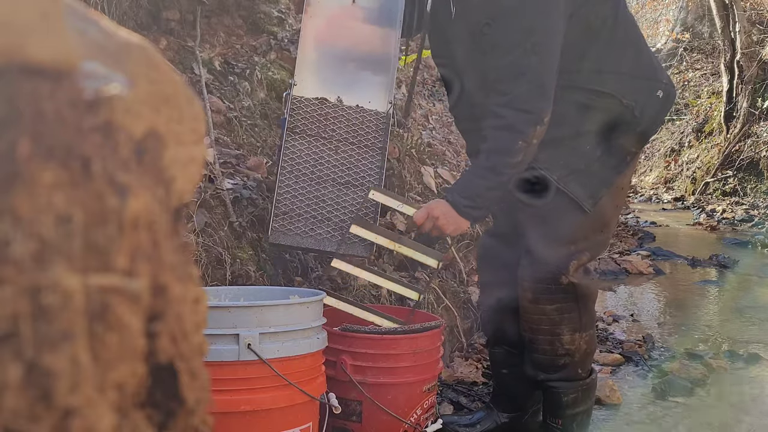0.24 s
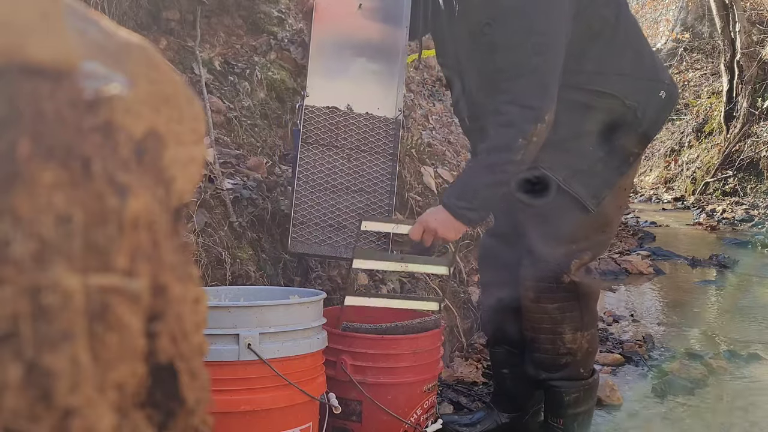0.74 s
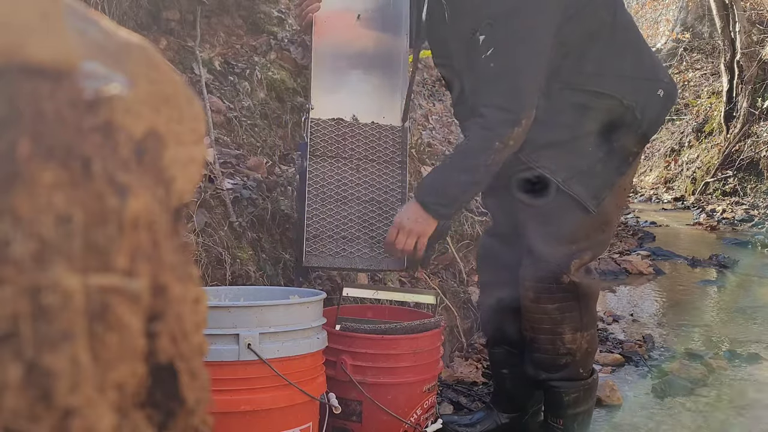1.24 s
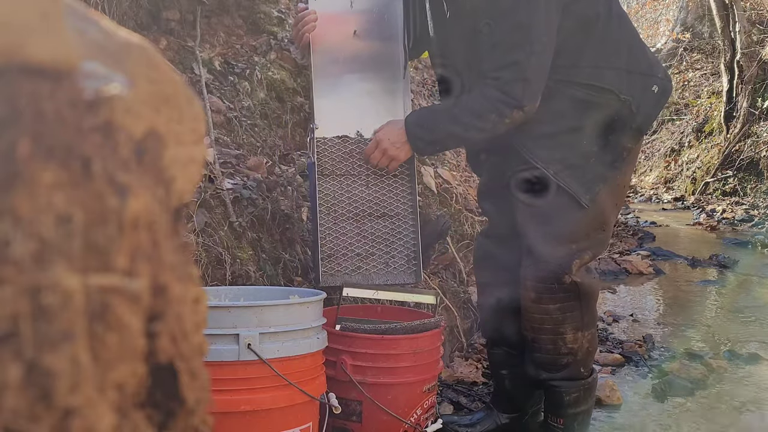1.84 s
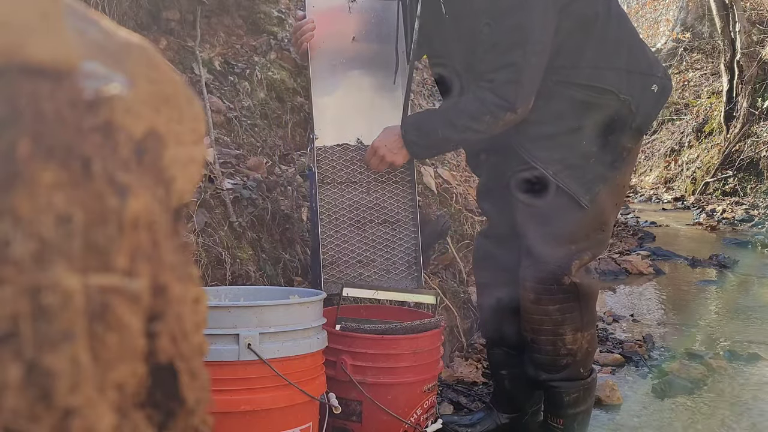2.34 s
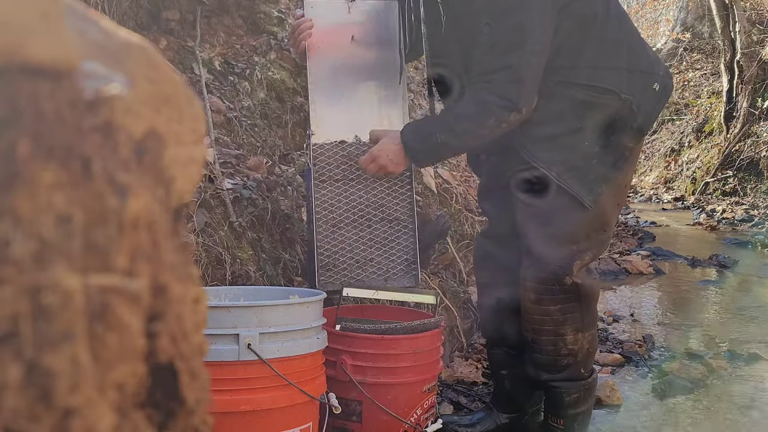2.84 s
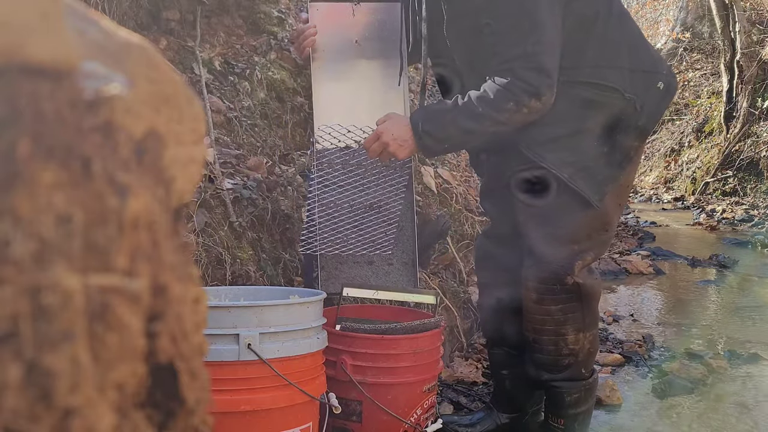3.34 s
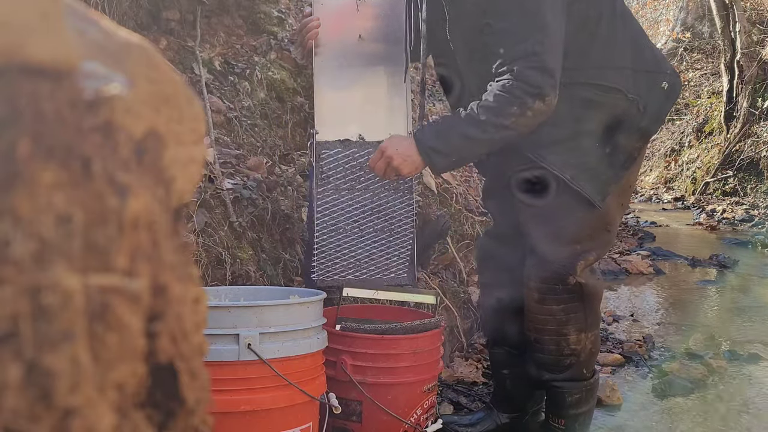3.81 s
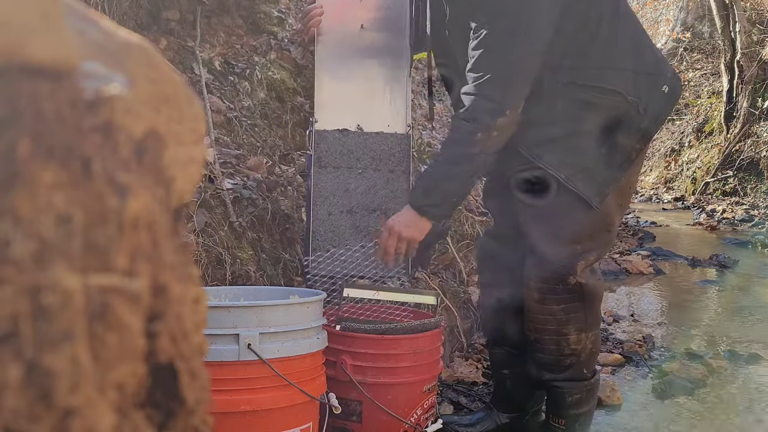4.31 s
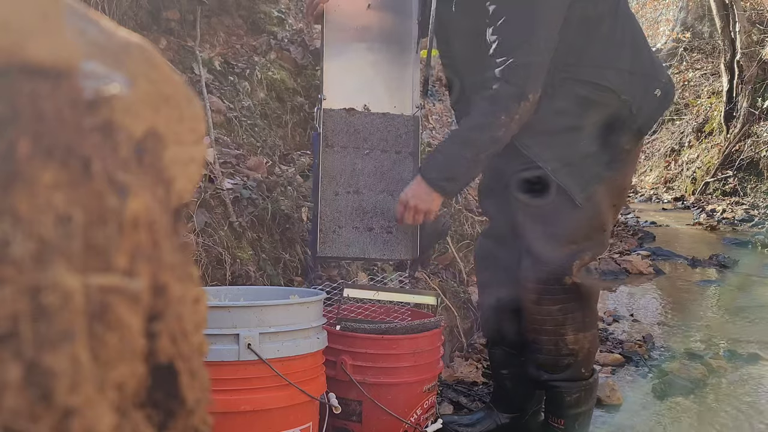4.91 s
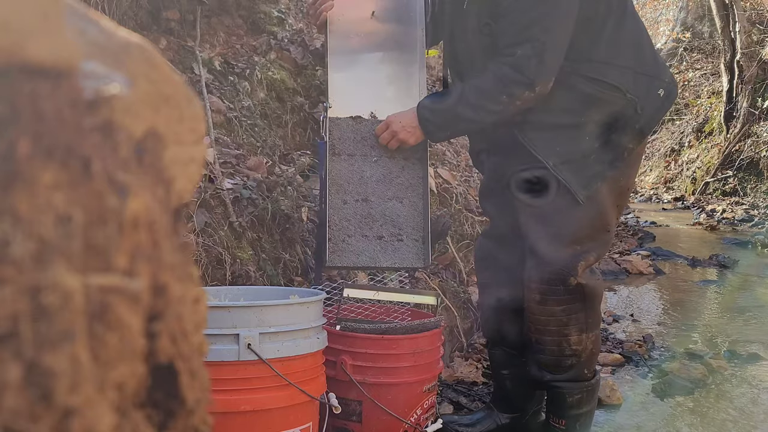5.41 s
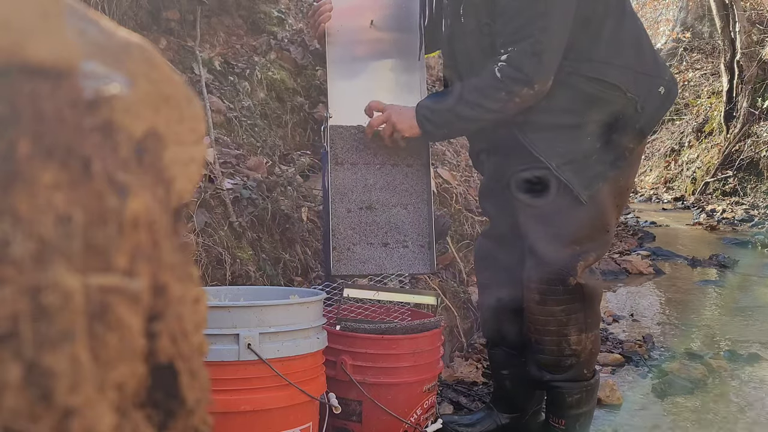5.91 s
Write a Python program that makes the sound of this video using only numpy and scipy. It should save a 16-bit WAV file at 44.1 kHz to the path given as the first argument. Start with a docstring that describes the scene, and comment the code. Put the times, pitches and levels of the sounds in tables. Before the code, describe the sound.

A creek babbles steadily while metal parts knock hollowly on a plastic bucket, a wet steel mesh scrapes harshly, then lighter clanks and bumps follow.

```python
"""Sluice box beside a creek.

An aluminium sluice box is taken apart over a plastic bucket: the riffle frame knocks (bucket modes)
and groans (a sinking tone), metal clanks (chatter through tray resonances), and a steel mesh scrapes
on the wet tray (clicks through narrow resonances). A creek runs all along, brighter on the right:
ringing bubbles and noise in third-octaves, with separate gulps, chirps, splashes and flung drops."""
import sys
import numpy as np
from scipy import signal
from scipy.fft import rfft, irfft
from scipy.io import wavfile
from scipy.ndimage import uniform_filter1d, map_coordinates

SR = 44100
rng = np.random.default_rng(int(sys.argv[2]) if len(sys.argv) > 2 else 0)


def digitize_waveform(pressure):
    """Quantize a signal to 16-bit integers and store it at the path in sys.argv[1].

    Rows of a 2-D input are taken as channels; values are limited to [-1, 1].
    """
    field = np.atleast_2d(pressure).T
    bounded = np.clip(field, -1, 1)
    quanta = np.round(bounded * 32767).astype(np.int16)
    wavfile.write(sys.argv[1], SR, quanta)


N = 271656
T = np.arange(N) / SR
HZ = np.maximum(np.arange(N // 2 + 1) * SR / N, 1)


def from_db(db):
    """Decibels to gain."""
    return 10 ** (np.asarray(db) / 20)


def rms_one(x):
    """Scale to an rms of 1."""
    return x / np.sqrt(np.mean(x ** 2) + 1e-20)


def at_hz(points):
    """Read a table of (Hz, value) along a log frequency axis."""
    hz, values = np.transpose(points)
    return np.interp(np.log(HZ), np.log(hz), values)


def drift(rate_hz):
    """Smooth random signal of rms 1: noise at SR / 40 through two equal low-pass poles."""
    r = np.exp(-80 * np.pi * rate_hz / SR)
    noise = rng.standard_normal(N // 40 + 2002)
    slow = signal.lfilter([1], [1, -2 * r, r * r], noise)[2000:]
    return np.interp(np.arange(N) / 40, np.arange(len(slow)), rms_one(slow))


def t60_decay(t, t60_s):
    """Exponential decay by 60 dB in t60_s."""
    return np.exp(-np.log(1000) * t / t60_s)


def ring(clicks, hz, t60_s):
    """Decaying mode: a unit click starts a sine of height 1."""
    r = np.exp(-np.log(1000) / (t60_s * SR))
    w = 2 * np.pi * hz / SR
    return signal.lfilter([0, np.sin(w)], [1, -2 * r * np.cos(w), r * r], clicks + 1e-18)


def resonate(x, hz, width_hz):
    """One resonance with a gain of 1 at its top."""
    r = np.exp(-np.pi * width_hz / SR)
    zeros = np.array([1, 0, -1]) * (1 - r * r) / 2
    poles = [1, -2 * r * np.cos(2 * np.pi * hz / SR), r * r]
    return signal.lfilter(zeros, poles, x + 1e-18)


def body(x, modes):
    """Resonances in parallel, signs alternating."""
    return sum((-1) ** k * from_db(db) * resonate(x, hz, width_hz)
               for k, (hz, width_hz, db) in enumerate(modes))


def cut(x, hz, kind, order=2):
    """Butterworth low- or high-pass."""
    return signal.sosfilt(signal.butter(order, min(hz, .45 * SR), kind, fs=SR, output="sos"), x)


def grains(per_s, spread_db, size=N):
    """Random clicks of uneven strength and random sign."""
    strength = from_db(spread_db * np.minimum(rng.exponential(1, size), 4))
    return (rng.random(size) < per_s / SR) * strength * rng.choice([-1, 1], size)


def scatter(count):
    """Rows of (s, strength, size): loosely spaced moments, strength -1 to 1, size 0 to 1."""
    when, strength, size = rng.random((count, 3)).T
    return zip((np.arange(count) + when) / count * N / SR, 2 * strength - 1, size)


def add(out, s, sound):
    """Mix a sound in at time s."""
    start = max(round(s * SR), 0)
    out[..., start:start + sound.shape[-1]] += sound[..., :N - start]


def note(hz, t60_s, attack_s):
    """One mode builds up during the contact and rings out."""
    t = T[:SR // 4]
    return (1 - np.exp(-t / attack_s)) * t60_decay(t, t60_s) * np.sin(2 * np.pi * hz * t)


# Contacts with the bucket, rebounds included. Each row: time in seconds, level in dB,
# pitch favoured by the place of contact in Hz, reach around it in octaves.
BUCKET_CONTACTS = [(0.5113, -9, 603, .15), (0.5258, -12.5, 195, .35), (0.5366, -10.5, 270, .25),
                   (0.5522, -16, 290, .3), (0.6837, -6, 402, 0.21), (0.6879, -11.5, 240, .25),
                   (0.701, -12.5, 414, .09), (0.713, -11.5, 410, .09), (0.7273, -13, 420, .1),
                   (1.088, -18.5, 357, .2), (1.0965, -23, 360, .15), (1.104, -24, 760, .2),
                   (1.116, -18, 230, .3), (2.818, -23, 330, 0.47), (2.853, -21, 282, 0.28),
                   (4.207, -17.5, 386, 0.16), (4.230, -19, 205, .2), (4.3583, -10.5, 500, 0.36),
                   (4.369, -15, 330, .25), (4.386, -19.5, 220, .25), (4.402, -23, 370, .25),
                   (4.450, -22.5, 840, 0.33), (4.645, -20, 493, .5), (4.665, -21, 380, .25),
                   (4.679, -25, 400, .4)]
# Modes of the bucket and the sluice resting on it. Each row: pitch in Hz, level in dB, t60 in seconds.
BUCKET_MODES = [(170, -2, 0.068), (208, -4.5, 0.038), (265, -0.5, 0.049), (363, -1.5, 0.076),
                (412, -4, 0.1), (435, -27, 0.084), (550, -7.5, 0.051), (623, -5.5, 0.06), (720, -8, 0.042),
                (814, 2.5, 0.043)]


def thumps():
    """Each contact rings the bucket's modes, most of all those near the pitch that it favours."""
    out = np.zeros(N)
    s, db, favoured_hz, reach_octaves = np.transpose(BUCKET_CONTACTS)
    for hz, mode_db, t60_s in BUCKET_MODES:
        distance = np.log2(hz / favoured_hz) / reach_octaves
        blows = np.zeros(N)
        blows[np.round(s * SR).astype(int)] = from_db(db + mode_db) / (1 + distance ** 2)
        out += ring(blows, hz, t60_s)
    return cut(out, 970, "low")  # plastic gives a soft contact


# Groan of the riffle frame on the bucket's rim as it slows.
# Each row: time in seconds, pitch in Hz, level in dB rms.
GROAN_PATH = [(0.775, 328, -45), (0.812, 320, -29.5), (0.84, 317, -32), (0.882, 292, -28.5),
              (0.905, 284, -46)]


def groan(rough_db):
    """Stick and slip on the plastic rim: a low, uneven tone that sinks in pitch."""
    s, hz, db = np.transpose(GROAN_PATH)
    level = from_db(np.interp(T, s, db) + rough_db * drift(60)) * (T > s[0]) * (T < s[-1])
    phase = 2 * np.pi * np.cumsum(np.interp(T, s, hz)) / SR
    return np.sqrt(2) * level * np.sin(phase)


# Metal on metal. Each row: time in seconds, level in dB before trim, t60 in seconds, lowest Hz,
# highest Hz, pitch of the note the spot rings with in Hz, note level in dB relative to the blow's.
METAL_BLOWS = [(0.008, -12.5, 0.027, 980, 2290, 1200, 0.5), (0.082, -26.5, 0.05, 1400, 2980, 1760, 9),
               (0.433, -22.5, 0.036, 885, 3500, 1380, 1), (0.5105, -11, .018, 1400, 2000, 1580, 5),
               (0.5114, -14, .022, 2700, 4850, 4440, -1), (0.5165, -21.5, .11, 650, 2400, 1850, -7),
               (0.683, -10, 0.035, 900, 7100, 1276, 0), (0.686, -13.5, .04, 700, 2500, 1240, 1),
               (0.6927, -18.5, 0.06, 650, 4300, 3900, -4), (0.705, -25, .05, 650, 2200, 1950, -4),
               (0.722, -23, .06, 650, 2200, 1380, -4), (1.086, -20.5, 0.06, 700, 3000, 1260, -1),
               (1.097, -22.5, 0.087, 1100, 2400, 1395, -8), (2.619, -23.5, 0.099, 1300, 2600, 1800, -6),
               (3.103, -27, 0.06, 1500, 2900, 1800, 2), (3.926, -35, 0.022, 3500, 12000, 3970, 0),
               (4.173, -26.5, 0.05, 1410, 2210, 1770, 6), (4.309, -26, 0.13, 1100, 2400, 1262, -1.5),
               (4.358, -15, 0.05, 700, 1400, 1700, 3), (4.450, -26.5, 0.08, 780, 2500, 1250, -6),
               (4.5856, -16.8, 0.016, 2210, 4270, 2220, 4.5), (4.616, -23, 0.035, 3000, 8000, 4050, 1),
               (4.645, -19, 0.044, 700, 1810, 1205, -4), (5.049, -25.5, 0.17, 1300, 2500, 1850, -8),
               (5.225, -23.5, 0.11, 1410, 4150, 1850, -12), (6.092, -33, .1, 1500, 2400, 1820, 5)]
# Broad resonances of the tray. Each row: centre in Hz, width in Hz, gain in dB.
TRAY_MODES = [(620, 64, -2.5), (803, 78, 5), (1190, 177, 5), (1470, 23, 4), (1653, 116, -0.5),
              (1920, 390, -1), (2332, 35, 2), (3560, 540, -8), (4040, 160, 3.5), (5700, 540, -4),
              (7130, 250, 1.5), (12500, 14500, 0.5)]
CONTACTS_PER_S, CONTACT_SPREAD_DB, NOTE_ATTACK_S = 4000, 3, 0.0014
CRACK_DB, CRACK_S = -4, .0018  # sharp first contact
CHATTER_TRIM_DB = -4.5


def clanks(width):
    """A sharp contact and a loose, fast-dying chatter ring the tray, with one note standing out."""
    out, t = np.zeros((2, N)), T[:SR // 4]
    for s, db, t60_s, low_hz, high_hz, note_hz, note_db in METAL_BLOWS:
        fade = t60_decay(t, t60_s) + from_db(CRACK_DB) * np.exp(-t / CRACK_S)
        clicks = np.array([grains(CONTACTS_PER_S, CONTACT_SPREAD_DB, size=len(t)) for _ in range(2)])
        chatter = body(clicks * fade, TRAY_MODES)
        chatter = cut(cut(chatter, high_hz, "low", order=12), low_hz, "high", order=4)
        mid, side = (rms_one(v) for v in chatter)
        stereo = mid + width * side * np.array([[1], [-1]])
        add(out, s, from_db(db + CHATTER_TRIM_DB) * np.sqrt(np.mean(fade ** 2)) * stereo)
        add(out, s, from_db(db + note_db) * note(note_hz, t60_s, NOTE_ATTACK_S) * from_db([[-1], [1]]))
    return out


PULL_RELEASE_S = 0.03


def pull(start_s, attack_s, length_s):
    """A pull swells as it takes hold, keeps its speed and dies away."""
    attack = np.clip((T - start_s) / attack_s, 0, 1)
    return attack * np.exp(-np.clip((T - start_s - length_s) / PULL_RELEASE_S, 0, 20))


def wires(x, width_hz, count):
    """The many lesser strands ring closely spaced, narrow modes all through the treble."""
    pitches_hz = np.linspace(5000, 15600, count) + rng.normal(0, 60, count)
    return sum((-1) ** k * resonate(x, hz, width_hz) for k, hz in enumerate(pitches_hz))


# Pulls of the mesh along the tray, the last as it is laid back. Each row: start in seconds,
# time to take hold in seconds, length in seconds, screech drive in dB, rasp drive in dB.
MESH_PULLS = [(0.585, 0.039, 0.13, -29, -23), (0.743, .004, 0.013, -21.5, -24),
              (0.76, 0.029, 0.11, -23, -22), (0.904, 0.047, 0.089, -20.5, -23),
              (0.98, 0.0087, .045, -23.5, -22), (1.022, 0.031, 0.058, -17, -18),
              (4.27, .04, 0.081, -29, -26.5), (4.422, 0.031, 0.18, -43, -32)]
# Mesh strands that sing as the edge passes them.
# Each row: pitch in Hz, width in Hz, relative level in dB, time when loudest in seconds.
MESH_STRANDS = [(3790, 37, -1, 1.07), (4530, 70, -6, .83), (5110, 38, -3, 0.96), (5570, 35, 2, 1.05),
                (5830, 80, 1, 1.03), (6330, 56, -5, .78), (6500, 60, 0, .98), (6850, 29, 2, 0.69),
                (7060, 75, 4, 1.01), (7160, 33, 5, 0.8), (7480, 40, 3, 0.83), (7900, 30, 0, 0.93),
                (8350, 39, 0, 0.79), (9400, 50, -6, 0.99), (11000, 58, 2, 0.79), (11260, 50, 2.5, 1.076),
                (11400, 55, 0, 1), (12700, 60, -2, 0.93), (14030, 70, 0, 0.82), (14600, 60, -3, 1.04)]
STUTTER_DB, STRAND_WAVER_S = 1.4, .00004


def drag(passing_s):
    """Wet grit catches under the mesh: its strands sing in turn, the tray rasps, the bucket drones."""
    stutter = from_db(STUTTER_DB * drift(46))
    drives = [from_db([[screech_db], [rasp_db]]) * pull(start_s, attack_s, length_s)
              for start_s, attack_s, length_s, screech_db, rasp_db in MESH_PULLS]
    screech, rasp = stutter * np.max(drives, axis=0)
    catches, scattered = rms_one(grains(3000, 2.6)), rms_one(grains(6000, 3.4))
    screech_catches, rasp_catches = catches * screech, catches * rasp

    strands = 0
    for hz, width_hz, db, loudest_s in MESH_STRANDS:
        passing = 1 + ((T - loudest_s) / passing_s) ** 2
        strands = strands + from_db(db) * resonate(screech_catches / passing, hz, width_hz)
    # the flexing mesh bends their pitch
    strands = map_coordinates(strands, [(T + STRAND_WAVER_S * drift(16.6)) * SR], order=3)

    ahead = 3.24 * strands + cut(screech_catches, 5200, "high")
    ahead = ahead + 1.1 * wires(screech_catches, width_hz=32, count=56)
    ahead = ahead + 0.78 * body(rasp_catches, TRAY_MODES)
    ahead = ahead + 2.0 * resonate(rasp_catches, 305, 130)  # bucket drone
    around = 0.31 * cut(body(scattered * rasp, TRAY_MODES), 6000, "low")
    around = around + 0.68 * resonate(scattered * screech, 4500, 2500)
    return ahead + around * np.array([[1], [-1]])  # the wide tray radiates differently to each side


# Short scrapes of metal and grit, with a few drips and splashes.
# Each row: start in seconds, level in dB, length in seconds, centre in Hz.
SCRAPES_AND_DRIPS = [(.004, -24, 0.0087, 6960), (.076, -24.5, 0.0073, 13000), (.426, -29, 0.015, 11000),
                     (.496, -29, 0.014, 1870), (.497, -30, 0.022, 4300), (.597, -30, 0.0034, 6500),
                     (.627, -28, .012, 1800), (.656, -29, 0.022, 3630), (.682, -18.5, 0.0084, 8850),
                     (.682, -23, 0.0061, 2100), (.760, -23, 0.019, 14000), (.945, -26, .02, 6800),
                     (3.101, -29, .012, 6140), (5.655, -33, .012, 6900), (1.054, -20, .018, 5970),
                     (1.449, -27.5, 0.017, 6500), (1.973, -32, 0.036, 2030), (2.703, -31, 0.025, 8060),
                     (3.267, -22.5, 0.013, 14100), (4.110, -31, 0.013, 6430), (4.206, -28, 0.025, 6560),
                     (4.286, -28, 0.031, 13200), (4.298, -29, 0.021, 6000), (4.515, -32, .02, 6000),
                     (5.045, -33, 0.013, 4060)]
SPLAT_DB, SPLAT_SPREAD_DB, SPLAT_S, SPLAT_HZ = -38, 1, 0.02, 6950  # faint creek splashes at random


def scuffs_and_splats():
    """Brief scrapes and splashes swell quickly and die, each ringing one broad resonance."""
    out = np.zeros(N)
    splats = [(s, SPLAT_DB + SPLAT_SPREAD_DB * strength, SPLAT_S, SPLAT_HZ * 2 ** (0.86 * (size - .5)))
              for s, strength, size in scatter(count=12)]
    for s, db, length_s, hz in list(SCRAPES_AND_DRIPS) + splats:
        t = T[:int(3 * length_s * SR)] / (length_s / 3)
        swell = t * np.exp(1 - t)
        burst = resonate(grains(8000, 0.46, size=len(t)) * swell, hz, 0.2 * hz)
        add(out, s, from_db(db) * np.sqrt(np.mean(swell ** 2)) * rms_one(burst))
    return out


# Modes rung as the mesh sticks and slips on the flexing tray.
# Each row: pitch in Hz, gain per slip in dB, t60 in seconds.
JUDDER_MODES = [(300, -18, 0.0081), (536, -11.5, 0.01)]


def judder(start_s, slips_per_s):
    """Six quick, soft slips make one hollow bonk."""
    slips = np.zeros(N)
    for k, db in enumerate([5.5, 7.5, 4.5, -1, 3.0, -15]):
        slips[round((start_s + k / slips_per_s) * SR)] = from_db(db)
    bonk = sum(from_db(db) * ring(slips, hz, t60_s) for hz, db, t60_s in JUDDER_MODES)
    return cut(bonk, 540, "low", order=4)


# Light, hollow tock as the mesh is picked up. Each row: pitch in Hz, level in dB, t60 in seconds.
TOCK_MODES = [(737, -20.5, 0.065), (860, -20, 0.032)]


def tock(s, attack_s):
    """A soft touch rings two close, hollow modes."""
    out = np.zeros(N)
    add(out, s, sum(from_db(db) * note(hz, t60_s, attack_s) for hz, db, t60_s in TOCK_MODES))
    return out


def banks(x):
    """A few softened echoes from the ground and the creek banks, different on each side."""
    out, dull = np.zeros((2, N)), cut(cut(x, 9100, "low"), 380, "high")
    lags_s = np.geomspace(.006, .075, num=12) * rng.uniform(.9, 1.1, 12)
    for k, lag_s in enumerate(lags_s):
        add(out[k % 2], lag_s, dull[k % 2] * from_db(-150 * lag_s) * (-1) ** (k // 2))
    return out


def babble(low_flicker_db, high_flicker_db, surge_db, bubble_share, cycles):
    """White water noise: in each third of an octave, bubbles ring over a rush of finer spray."""
    out, surge = 0, 0.35 * drift(18.0) + 0.34 * drift(37)
    for hz in 25 * 2 ** (np.arange(29) / 3):
        treble = np.clip(np.log(hz / 300) / np.log(8000 / 300), 0, 1)
        bubbles = rms_one(ring(grains(70 + hz / 14, 2.8), hz, cycles / hz))
        rush = rms_one(resonate(rng.standard_normal(N), hz, hz / 3))
        share = np.clip(bubble_share, 0, 1) * (hz > 150)
        water = np.sqrt(share) * bubbles + np.sqrt(1 - share) * rush
        flicker_db = low_flicker_db * (1 - treble) + high_flicker_db * treble
        level = from_db(flicker_db * drift(17.4) + surge_db * treble * surge)
        out = out + np.sqrt(hz) * rms_one(water * level)
    spectrum = rfft(out)
    # even out the long-term colour to unit power per Hz
    power = uniform_filter1d(abs(spectrum) ** 2 + 1e-6, size=301)
    return spectrum * np.sqrt(N * SR / 2 / power)


def glances(echoes):
    """Short reflections ripple the colour like a comb."""
    return 1 + sum(gain * np.exp(-2j * np.pi * HZ * delay_s) for delay_s, gain in echoes)


# Creek colour at each microphone, before glances and swell. Each row: Hz, density in dB per Hz.
LEFT_COLOUR = [(25, -88), (60, -71.5), (100, -68), (130, -60), (175, -67), (220, -59), (275, -65),
               (400, -53), (455, -60), (530, -58.5), (680, -72.5), (1150, -67.5), (1400, -69),
               (1750, -63.5), (2800, -71), (4000, -70), (4500, -71), (6500, -75), (7050, -67),
               (7800, -79.5), (8700, -74), (9700, -80.5), (12000, -76), (15500, -74.5)]
RIGHT_COLOUR = [(25, -88), (60, -65.5), (100, -65), (130, -59), (175, -66.5), (220, -58.5), (275, -69.5),
                (390, -61.5), (440, -68.5), (560, -64), (800, -66), (1100, -65), (2300, -68), (3000, -64),
                (4600, -68.5), (5400, -64.5), (7000, -65), (7800, -76), (9800, -76), (11500, -70),
                (15500, -70)]
# Phase by which the creek on the left trails the right. Each row: Hz, lag in radians.
LEFT_LAG = [(100, 0.014), (300, 0.041), (410, 1.55), (500, 3.06), (900, 2.5), (1350, 4.74), (1550, 3.5),
            (1900, 6.37), (2300, 8.06), (3300, 10), (4400, 14.58), (5200, 16.4), (6400, 18.85)]
# Weak reflections from nearby surfaces. Each row: delay in seconds, signed gain.
LEFT_GLANCES = [(.00046, 0.02), (.00122, 0.23), (.00178, 0.039)]
RIGHT_GLANCES = [(.00091, -0.035), (.00242, -0.11), (.00505, -.06), (.00559, 0.21)]
# Slow swell of the low background, fuller while the sluice box is being handled; its mean is removed.
# Each row: time in seconds, level in dB.
BACKGROUND_SWELL = [(0.0, -29), (0.99, -28.5), (1.36, -34.5), (4.1, -33.5), (4.41, -29.5), (5.01, -34),
                    (6.16, -33.5)]
LOW_DB, TREBLE_DB = 0.92, -1  # at mean swell
LOW_FOLLOWS, TREBLE_FOLLOWS = 0.73, 0.076  # share of the swell that each follows


def creek():
    """Near water reaches the right microphone first; far water comes from all around."""
    near = babble(low_flicker_db=3.5, high_flicker_db=3.0, surge_db=2.0, bubble_share=0.56, cycles=17.8)
    far = rfft(rng.standard_normal(N)) * np.sqrt(SR / 2)
    # likeness of the two sides: (Hz, 0 to 1)
    alike = at_hz([(25, 0.8), (70, 1.0), (150, 1.0), (700, 0.94), (1400, 0.69), (1850, 0.73),
                   (2500, 0.78), (5800, 0.7), (7200, 0.92), (11000, 1.0)])
    alike = np.clip(alike, 0, 1)
    near, far = near * np.sqrt((1 + alike) / 2), far * np.sqrt((1 - alike) / 2)
    left = (near + far) * from_db(at_hz(LEFT_COLOUR)) * glances(LEFT_GLANCES)
    left = left * np.exp(-1j * at_hz(LEFT_LAG))
    right = (near - far) * from_db(at_hz(RIGHT_COLOUR)) * glances(RIGHT_GLANCES)

    level_db = np.interp(T, *np.transpose(BACKGROUND_SWELL))
    swell_db = level_db - level_db.mean()
    low_gain = from_db(LOW_DB + LOW_FOLLOWS * swell_db)
    treble_gain = from_db(TREBLE_DB + TREBLE_FOLLOWS * swell_db)
    treble = 1 / (1 + (2700 / HZ) ** 4)
    both = np.array([left, right])
    return low_gain * irfft(both * (1 - treble), N) + treble_gain * irfft(both * treble, N)


# Gulps of the creek at set times. Each row: start in seconds, level in dB before trim, pitch in Hz.
TIMED_GULPS = [(.408, -23.5, 370), (1.409, -21.5, 311), (1.783, -26, 398), (2.231, -22.5, 385),
               (3.19, -25.5, 383), (3.414, -22, 388), (3.634, -23, 209), (5.02, -22, 392),
               (5.617, -22.5, 367), (5.859, -22, 229), (5.968, -27, 255)]
# further gulps at random times, level before trim
GULP_DB, GULP_SPREAD_DB, GULP_LOW_HZ, GULP_HIGH_HZ = -26.5, 5, 132, 392
GULP_TRIM_DB = -7.0


def gulps():
    """Trapped air pockets wobble for a few cycles, rising slightly in pitch."""
    out, t = np.zeros(N), T[:SR // 10]
    further = [(s, GULP_DB + GULP_SPREAD_DB * strength, GULP_LOW_HZ * (GULP_HIGH_HZ / GULP_LOW_HZ) ** size)
               for s, strength, size in scatter(count=18)]
    swell = t / 0.0051 * np.exp(1 - t / 0.0068)
    for s, db, hz in list(TIMED_GULPS) + further:
        wobble = np.sin(2 * np.pi * (hz * t * (1 + 0.44 * t) + rng.random()))
        add(out, s, from_db(db + GULP_TRIM_DB) * swell * wobble)
    return out * from_db([[1.5], [-1.5]])


def trickle(level_db, cycles, lowest_hz, octaves, count):
    """Single small bubbles chirp upward out of the rush, here and there across the creek."""
    out, t = np.zeros((2, N)), T[:SR // 20]
    shuffled = (rng.permutation(count) / count for _ in range(4))
    for when, pitch, softness, place in zip(*shuffled):
        hz = lowest_hz * 2 ** (octaves * pitch)
        age = t * hz / cycles
        chirp = (1 - np.exp(-8 * age)) * np.exp(-age) * np.sin(2 * np.pi * hz * t * (1 + 0.025 * age))
        pan_db = 14 * (place - .6) * np.array([[.5], [-.5]])
        start_s = (when + rng.normal(0, .02)) % 1 * N / SR
        add(out, start_s, from_db(level_db - 8 * softness + pan_db) * chirp)
    return out


def spatter(level_db, per_s, spread_db, burst_s):
    """Flung drops land on water and stones, each a tiny bright burst of spray."""
    drops = abs(grains(per_s, spread_db))
    bursts = signal.lfilter([1], [1, -np.exp(-1 / (burst_s * SR))], drops)
    spray = rms_one(cut(bursts * rng.standard_normal(N), 3500, "high", order=1))
    return from_db(level_db) * spray * from_db([[-1.5], [1.5]])


def scene():
    """The work at the bucket, with splashes, is about straight ahead, the creek all along."""
    booms = thumps() + judder(2.6155, 298) + tock(3.103, attack_s=0.0032)
    booms = cut(booms, 152, "high")  # small bodies radiate little bass
    close = (booms + groan(rough_db=3)) * from_db([[.6], [-.6]])
    close = close + clanks(width=0.43) + drag(passing_s=0.063)
    close = close + scuffs_and_splats() * from_db([[-.5], [.5]])
    water = creek() + gulps()
    water = water + trickle(level_db=-28.5, cycles=11.9, lowest_hz=1097.5, octaves=2.8, count=330)
    water = water + spatter(level_db=-43, per_s=35, spread_db=0.5, burst_s=0.0047)
    return close + from_db(-10.0) * banks(close) + water


CUTOFF_HZ = 15800


def record(dry):
    """Peaks are rounded by tanh, the top is cut by a steep elliptic low-pass."""
    top_cut = signal.ellip(12, .1, 90, CUTOFF_HZ, fs=SR, output="sos")
    return signal.sosfilt(top_cut, np.tanh(dry))


dry = scene()
out = record(dry)
digitize_waveform(out)
```